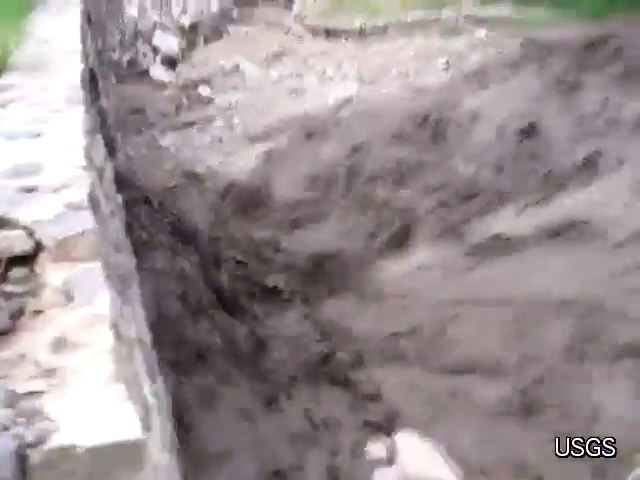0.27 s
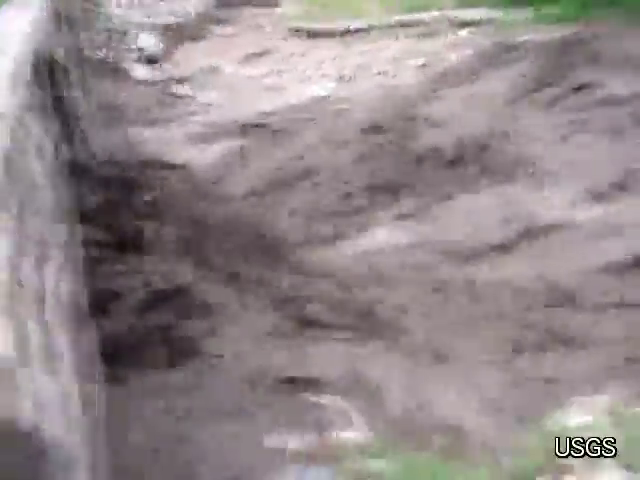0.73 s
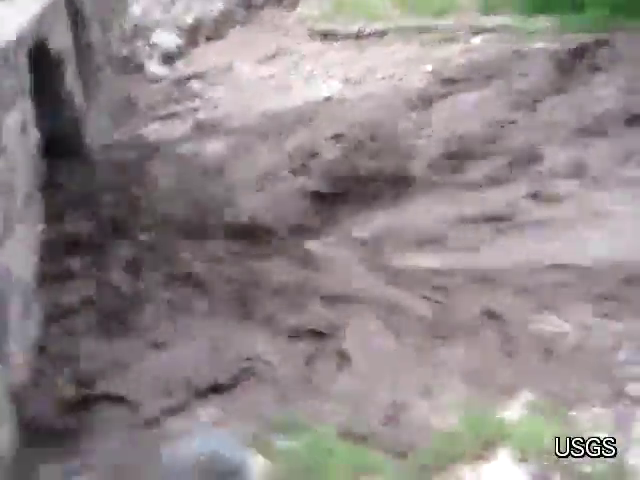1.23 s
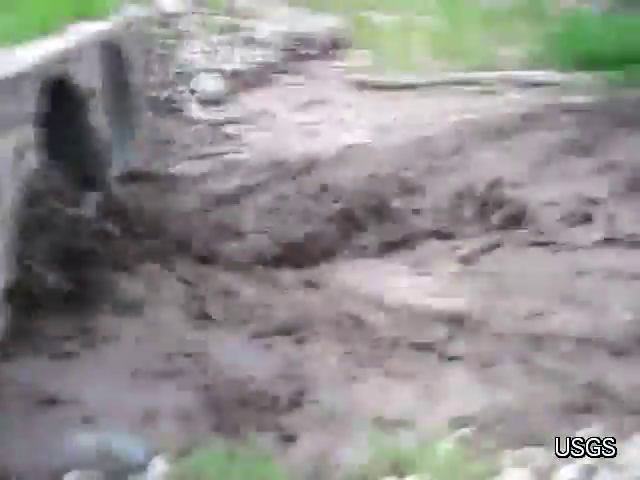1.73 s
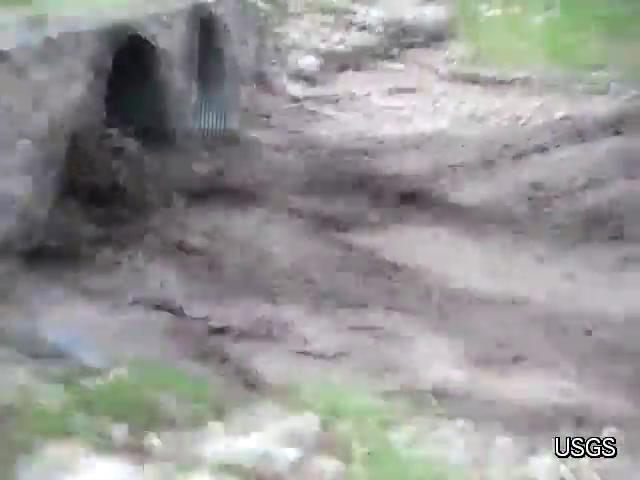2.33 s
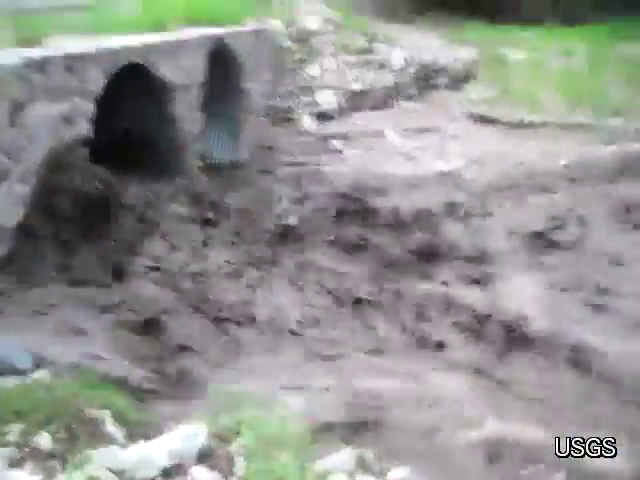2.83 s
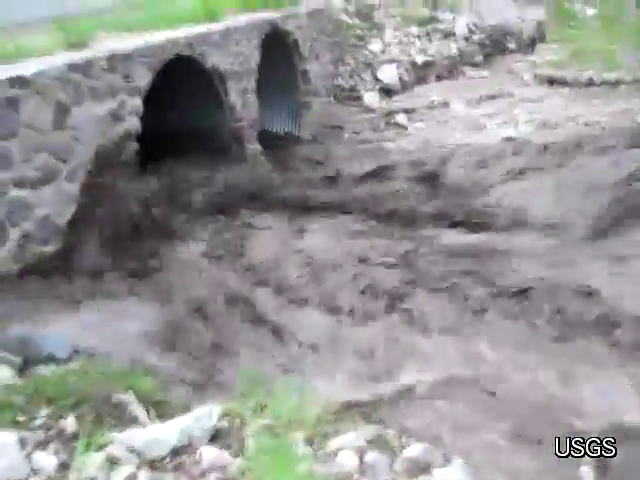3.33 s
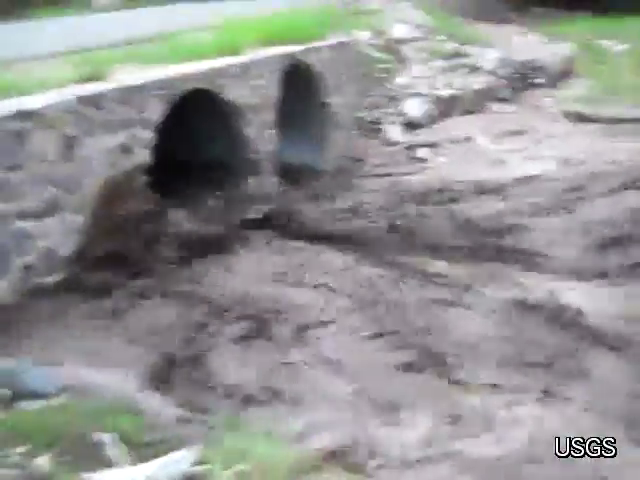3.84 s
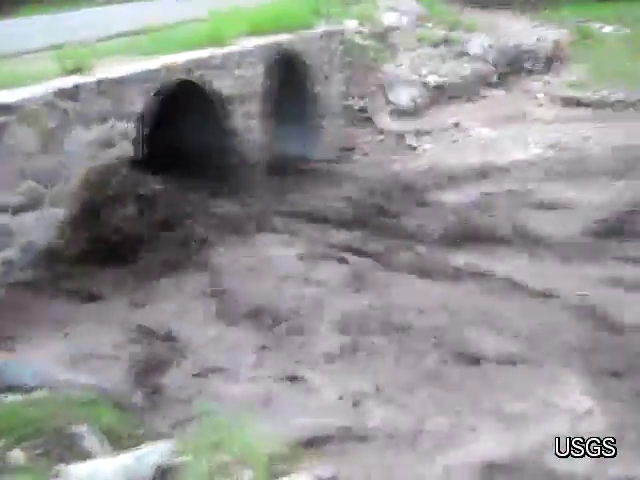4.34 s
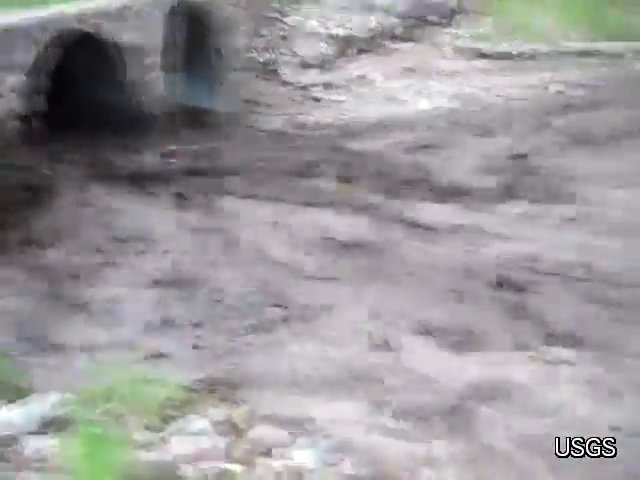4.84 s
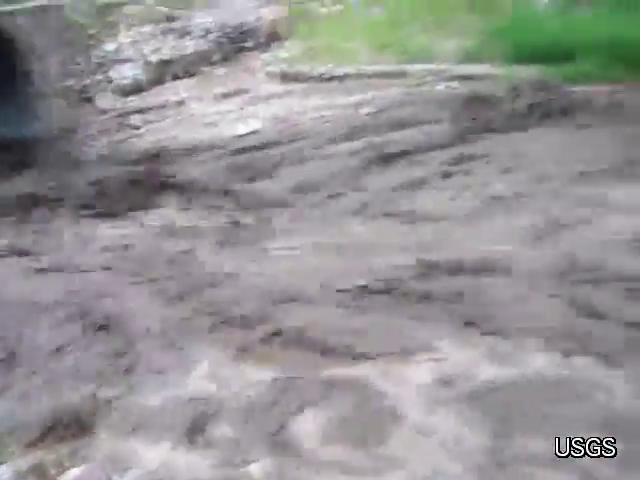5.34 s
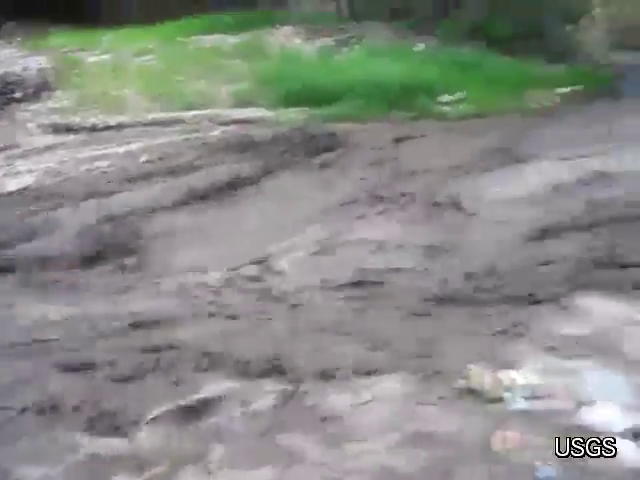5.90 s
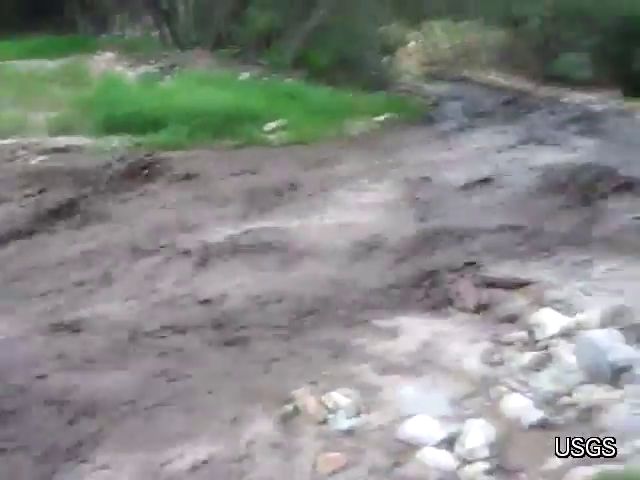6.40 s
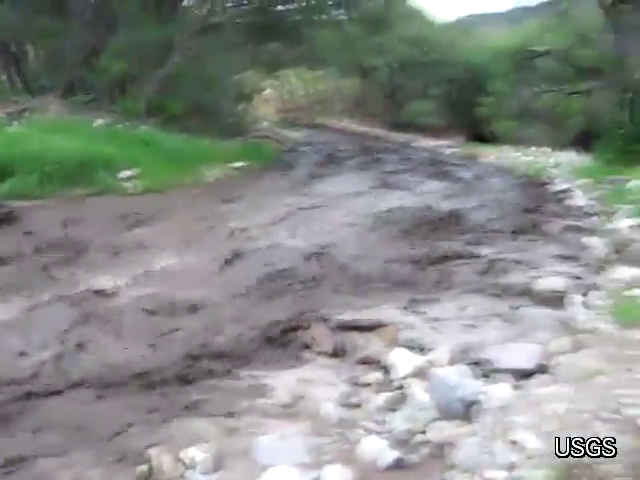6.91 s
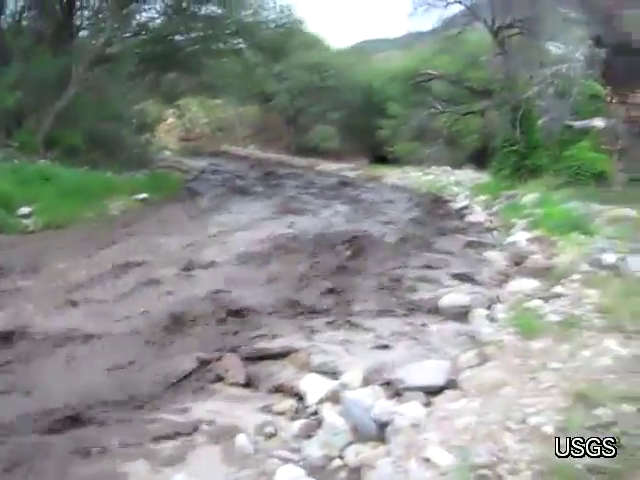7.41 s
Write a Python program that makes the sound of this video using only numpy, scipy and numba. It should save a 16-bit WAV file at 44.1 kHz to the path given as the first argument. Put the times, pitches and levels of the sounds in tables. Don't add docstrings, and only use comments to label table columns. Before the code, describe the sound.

From 0 s a loud, wet, broadband roar is in full flow: muddy floodwater pouring from a culvert over stones, heard from a few metres away outdoors. Deep rumble and dull boulder thumps lie below, bubbling churn in the middle, gritty hissing spray above. Hollow gulps stand out near 0.3, 2.1 and 2.6 s; sudden level dips follow crests around 0.6 and 0.9 s. A shifting, slightly hollow colour comes from the bank echo. From 1.3 to 3 s the water heaves heavily, with clustered thumps near 1.3 and 1.9 s. From 4.6 s surges strengthen, peaking near 5.6, 6.5 and 7.4 s, with more gurgling and churning and slightly less spray as the microphone turns to the open channel. Faint low wind puffs persist. The small camera sounds compressed, clipped and coarse, with dulled top treble. The roar continues to an abrupt end at about 7.7 s.

```python
import sys
import numpy as np
from scipy import signal
from scipy.fft import rfft, irfft, next_fast_len
from scipy.io import wavfile
from scipy.ndimage import uniform_filter1d, map_coordinates
from numba import njit

SR = 44100
rng = np.random.default_rng(int(sys.argv[2]) if len(sys.argv) > 2 else 0)


def master(y):
    cut = np.clip(np.atleast_2d(y).T, -1, 1)
    pcm = np.round(cut * 32767)
    wavfile.write(sys.argv[1], SR, pcm.astype(np.int16))


def linear_from_db(decibels):
    return 10 ** (np.asarray(decibels, float) / 20)


N = 337806

# t/s, surge of heavy water/dB, turn from wall to open channel/0-1
SURGE = [(0, 0, 0.54), (.25, -1, 0.5), (.9, -0.5, 0), (1.35, 1, 0.26), (1.8, 1.5, 0), (2.7, 1.5, 0.08),
         (3.05, -1.5, 0.05), (3.6, 0.5, 0.45), (4.2, -.5, 0.5), (4.6, 3, 0.12), (5.0, -0.5, 0.55),
         (5.55, 3, 0.62), (6.0, -0.5, 0.74), (6.55, 3, 0.86), (6.9, 3, 0.88), (7.35, 4.5, 0.86),
         (7.66, 0, 1)]
# t/s, crest before/dB, drop after/dB
CRESTS = [(.0, 0, 2.5), (.374, 0.5, 0.5), (.594, -1.5, 5.5), (.654, 2.5, 4.5), (.918, 2, 5.5),
          (1.541, 3, 1.5), (1.616, 0.5, 1), (1.741, 1.5, 3.5), (1.821, 3, 2), (2.105, -1, 0.5),
          (2.449, -1, 2), (2.604, 5, -1), (2.883, 0, 3), (3.058, 1.5, 1), (3.652, 1, 1), (3.826, 1.5, 0),
          (3.901, -2.5, 1.5), (4.121, -1, 3.5), (4.385, 1.5, 0.5), (4.624, 2, -0.5), (5.044, -0.5, 1.5),
          (5.268, 2, 2), (5.617, 6.5, 2), (5.852, 4, 1.5), (6.111, 1.5, 0), (6.346, 4, 0), (6.605, 2, -2.5),
          (7.2, 2.5, 0.5), (7.29, -2, 5), (7.513, 2.5, 4)]
# t/s, level/dB
HEAVES = [(0.14, -2.5), (0.269, -0.5), (0.713, 1.5), (1.023, 4), (1.167, 0), (1.422, -2), (1.729, 3),
          (2.02, 0.5), (2.09, 2), (2.227, -0.5), (2.342, -0.5), (2.602, 2), (3.283, 4.5), (3.382, -0.5),
          (3.582, -2), (3.677, 1.5), (3.884, 3), (4.26, 0), (4.365, -3), (4.6, -6), (4.742, -0.5),
          (4.822, -2.5), (4.906, -3), (5.006, 1), (5.181, -1.5), (5.273, 1.5), (5.393, 0.5), (5.475, 1),
          (5.607, -4.5), (5.732, 2), (5.814, 2), (5.994, 0), (6.129, 2), (6.328, -1.5), (6.408, -0.5),
          (6.707, 0), (6.787, -0.5), (6.864, -2.5), (7.121, -3), (7.458, -3)]
# t/s, level/dB
SPLASHES = [(0.04, -2), (0.1, -2.5), (0.165, 0.5), (0.322, 0), (0.479, -1), (0.776, -0.5), (0.876, -1.5),
            (0.96, 1.5), (1.018, 0), (1.117, 1.5), (1.277, 1.5), (1.427, 1.5), (1.589, 0.5), (1.656, -1.5),
            (1.739, -1.5), (1.786, -2), (1.868, 0.7), (2.217, 2.5), (2.285, -1), (2.517, 1.5),
            (2.604, -1.5), (2.789, -1), (2.844, -1.5), (2.881, 2), (2.961, -2), (3.013, -0.5), (3.095, -2),
            (3.185, 1.3), (3.283, -2.0), (3.487, -1.6), (3.547, -0.5), (3.652, 1), (3.734, -3), (3.786, 1),
            (3.919, -2.5), (3.968, 0), (4.086, 1.1), (4.283, 1.5), (4.734, 0), (4.944, -1), (5.173, 2),
            (5.5, -0.5), (5.56, -2), (5.6, -2.5), (5.692, 1), (5.969, -1.9), (6.036, 1), (6.181, -2),
            (6.281, 3), (6.343, -1.5), (6.43, 0), (6.503, 2), (6.61, -5.5), (6.717, 1.5), (6.79, -0.8),
            (6.874, 3), (7.159, -0.5), (7.545, 0)]
# f/Hz, level per Hz/dB
RUMBLE_SPECTRUM = [(60, -26.5), (90, -10), (130, -1.5), (190, -1), (260, -1), (330, -5.5), (450, -25)]
# f/Hz, level per Hz/dB
CHURN_SPECTRUM = [(250, -14.5), (350, -1.5), (480, 0), (700, 2), (850, -2), (1050, -4.5), (1500, -12.5)]
# f/Hz, level per Hz/dB
SPRAY_SPECTRUM = [(700, -24), (1100, -9.5), (1700, -5), (3200, -1.7), (4400, 0.5), (5000, -0.84),
                  (6000, -6.5), (7500, -29)]
# t/s, peak level/dB, f/Hz
THUMPS = [(.195, -8.5, 196), (1.04, -18, 273), (1.715, -20, 223), (0.464, -30, 204), (0.646, -11.5, 225),
          (0.947, -23, 188), (1.291, -9, 196), (1.358, -8.5, 183), (1.61, -9, 233), (1.903, -10, 240),
          (1.973, -12, 186), (2.017, -10, 190), (2.371, -13, 177), (2.928, -9.5, 185), (3.12, -25, 215),
          (3.639, -12.5, 143), (4.22, -12, 144), (4.688, -14, 200), (5.076, -16, 292), (5.204, -11, 214),
          (5.346, -22, 193), (5.748, -7, 193), (5.842, -9.5, 168), (5.994, -12, 211), (6.047, -15, 230),
          (6.365, -15, 155), (6.589, -12, 180), (7.228, -17, 204), (7.39, -7, 251), (7.48, -7, 186)]
# t/s, peak level/dB, f/Hz
BOOMS = [(0.182, -23, 96.9), (0.266, -20, 94.2), (0.568, -25, 102), (0.648, -19, 129), (0.801, -24, 110),
         (0.942, -28, 121), (1.07, -22, 117), (1.179, -24, 127), (1.589, -23, 116), (1.703, -25, 127),
         (2.22, -21, 105), (2.38, -28, 129), (2.578, -20, 108), (2.649, -23, 118), (2.77, -24, 80.7),
         (2.978, -24, 86.1), (3.127, -25, 129), (3.212, -24, 118), (3.417, -29, 102), (3.506, -25, 113),
         (3.777, -24, 88.8), (4.164, -27, 99.6), (4.323, -23, 113), (4.49, -24, 130), (4.656, -25, 129),
         (4.854, -22, 105), (4.991, -22, 128), (5.13, -26, 80.7), (5.282, -27, 80.7), (5.643, -22, 116),
         (5.828, -24, 129), (5.924, -26, 105), (6.116, -25, 129), (6.229, -27, 116), (6.42, -26, 94.2),
         (6.648, -25, 127), (6.807, -23, 105), (7.189, -27, 110), (7.37, -22, 94.2), (7.49, -22, 96.9)]
# t/s, peak level/dB, f/Hz
GULPS = [(0.042, -5, 590), (0.135, -13, 600), (0.344, -3, 694), (2.102, -2, 644), (2.561, 1, 725),
         (2.721, -7, 560), (3.007, -1.5, 620), (3.514, -6, 630), (4.22, -4, 554), (4.291, -15, 725),
         (4.644, -5, 585), (4.907, -22, 507), (5.154, -18, 548), (5.24, -18, 510), (5.595, -6, 481),
         (5.99, -14, 456), (6.372, -15, 507), (6.48, 1, 552), (6.708, -3, 495), (6.855, -7, 467),
         (7.073, -13, 606), (7.166, -11, 573), (7.37, -8, 480)]
# t/s, peak level/dB, f/Hz
GURGLES = [(0.254, -15, 135), (1.237, -18, 134), (1.514, -13, 242), (2.088, -14, 167), (2.215, -16, 178),
           (2.432, -17, 183), (2.522, -16, 215), (2.579, -17, 106), (2.631, -16, 199), (2.686, -21, 199),
           (3.001, -13, 225), (3.312, -15, 249), (3.402, -14, 188.4), (3.584, -18, 231), (3.679, -19, 216),
           (3.993, -15.5, 206), (4.325, -16, 210), (4.422, -16, 177), (4.53, -17, 197), (4.879, -12.5, 156),
           (5.268, -15, 177), (5.345, -18, 199.5), (5.403, -23, 194), (5.46, -16, 256), (5.525, -15, 172),
           (5.58, -12, 212), (5.635, -18, 207), (5.702, -18, 201), (5.784, -18, 187), (5.996, -21, 175),
           (6.124, -12, 149), (6.246, -12.5, 246), (6.363, -15, 155), (6.43, -17, 156), (6.854, -23, 330),
           (6.949, -14, 262), (6.992, -16, 195), (7.061, -17, 140), (7.159, -21, 150), (7.288, -13.5, 171)]
# t/s, peak level/dB, f/Hz
BLIPS = [(0.117, -22, 524), (0.312, -16.5, 701), (0.367, -16, 335), (1.05, -17, 332), (1.464, -16.5, 329),
         (1.666, -21, 333), (2.093, -21, 637), (2.549, -23, 715), (3.784, -17.5, 538), (3.953, -21, 423),
         (4.275, -20, 335), (4.724, -19, 593), (5.405, -14.5, 351), (5.602, -16, 517), (5.774, -25, 335),
         (5.979, -27, 452), (6.074, -20, 330), (6.136, -18, 330), (6.206, -20, 549), (6.266, -19, 497),
         (6.311, -20, 340), (6.413, -18, 665), (6.47, -23, 568), (6.528, -20, 600), (6.65, -15, 340),
         (6.692, -16, 526), (6.737, -14, 332), (6.854, -23, 330), (6.932, -15, 419), (6.994, -19, 615),
         (7.049, -18, 335), (7.086, -23, 330), (7.146, -17, 346), (7.186, -14.5, 495), (7.229, -23, 355),
         (7.271, -20, 423), (7.398, -20, 335), (7.48, -23, 360), (7.54, -19, 570), (7.578, -22, 522)]
# t/s, peak level/dB, f/Hz
POPS = [(0.117, -20, 780), (0.325, -18, 713), (0.67, -20, 743), (0.741, -18, 877), (0.806, -14, 920),
        (1.179, -17, 743), (1.336, -16, 721), (1.408, -18, 748), (1.517, -18, 705), (2.013, -20, 813),
        (2.196, -16, 902), (2.323, -19, 802), (2.385, -17, 888), (2.562, -15, 716), (2.653, -19, 764),
        (2.81, -16, 724), (2.874, -16, 820), (3.313, -21, 1160), (3.669, -19, 1020), (3.774, -15, 1020),
        (4.046, -19, 1060), (4.365, -18, 773), (4.604, -19, 724), (4.711, -19, 791), (4.951, -20, 724),
        (5.037, -17, 1050), (5.344, -19, 1040), (5.645, -22, 860), (5.805, -18, 716), (6.031, -15, 942),
        (6.177, -21, 713), (6.258, -15, 704), (6.334, -17, 904), (6.423, -17, 703), (6.811, -18, 1010),
        (6.876, -13, 795), (7.091, -19, 1050), (7.274, -19, 1040), (7.412, -18, 1150), (7.608, -19, 732)]
# t/s, peak level/dB, f/Hz
TONES = [(.795, -18.5, 905), (.88, -23, 965), (.92, -23, 972), (.955, -18, 978), (.63, -18, 590),
         (1.09, -21, 680), (3.55, -14.5, 507), (5.14, -14.5, 555)]
# t/s, centre f/Hz, depth/0-1
DIP = [(0, 880, 0.5), (.4, 940, 0.24), (.75, 1120, 0.05), (.95, 560, 0.23), (1.3, 510, 0.53),
       (1.8, 530, 0.62), (2.1, 440, 0.66), (2.4, 470, 0.34), (2.65, 470, 0.65), (2.9, 490, 0.4),
       (3.1, 503, 0), (3.5, 850, 0.24), (4.5, 845, 0.24), (5.201, 790, 0.3), (6.0, 760, 0.3),
       (6.8, 710, 0.35), (7.66, 696, 0.48)]
# f/Hz, level per Hz/dB
BUFFET_SPECTRUM = [(15, -34), (25, -27.5), (45, -14), (75, -4.5), (95, -4.5), (140, -24.5)]
# t/s, level over the breeze/dB
GUSTS = [(.28, 12), (.65, 7), (1.36, 6), (1.62, 1), (2.05, 5), (2.55, 6.5), (2.79, 9), (3.5, 6), (3.99, 4),
         (4.8, 9), (5.42, 5), (5.72, 7), (6.02, 5), (6.47, 1), (6.93, 8), (7.4, 6), (7.58, 10)]


def rumble(t, surge_db, crest_db):
    crest_share = 0.45
    cloud = bubbles(count=3000, lo_hz=70, hi_hz=420, cycles=8, spread_db=1.6)
    level_db = -24.5 + surge_db + crest_share * crest_db + swells(t, HEAVES, width_s=0.05)
    return linear_from_db(level_db) * water(RUMBLE_SPECTRUM, cloud, share=0.15, flicker_db=0.2, rate_hz=9)


def churn(surge_db, turn, crest_db, splash_db):
    surge_share, turn_db, crest_share = 0.1, 3, 0.8
    cloud = bubbles(count=10000, lo_hz=280, hi_hz=1400, cycles=14, spread_db=1.8)
    level_db = -24.5 + surge_share * surge_db + turn_db * turn + crest_share * crest_db + splash_db
    return linear_from_db(level_db) * water(CHURN_SPECTRUM, cloud, share=0.2, flicker_db=0.3, rate_hz=12)


def spray(surge_db, turn, crest_db, splash_db):
    surge_share, turn_db = -0.18, -1.3
    cloud = bubbles(count=60000, lo_hz=800, hi_hz=7000, cycles=8, spread_db=2.2)
    level_db = -20 + surge_share * surge_db + turn_db * turn ** 2 + crest_db + splash_db
    return linear_from_db(level_db) * water(SPRAY_SPECTRUM, cloud, share=0.2, flicker_db=0.3, rate_hz=24)


def boulders():
    thumps = struck(THUMPS, t60_s=0.09, rise=0.033, glide=0.095, trim_db=1.0)
    booms = struck(BOOMS, t60_s=0.2, rise=0.088, glide=0.05, trim_db=3.5)
    return thumps + booms


def air_pockets():
    gulps = struck(GULPS, t60_s=0.041, rise=0.11, glide=0.079, trim_db=-4.5)
    gurgles = struck(GURGLES, t60_s=0.12, rise=0.09, glide=0.049, trim_db=4.5)
    blips = struck(BLIPS, t60_s=0.12, rise=0.092, glide=0.08, trim_db=5.0)
    pops = struck(POPS, t60_s=0.07, rise=0.1, glide=0.06, trim_db=-2.5)
    return gulps + gurgles + blips + pops


def lingering_pockets():
    return struck(TONES, t60_s=0.17, rise=0.2, glide=0.065, trim_db=6.5)


def bank_echo(flood, t):
    s, hz, depth = np.transpose(DIP)
    return cancel(flood, np.interp(t, s, hz), np.interp(t, s, depth), 0.3, 1. * SR)


def wind(t, turn):
    level_db = -39.5 + 3 * turn + swells(t, GUSTS, width_s=0.07)
    return linear_from_db(level_db) * colour(rng.standard_normal(N), BUFFET_SPECTRUM)


def crests(t):
    build_s, recover_s, drop_s = 0.044, 0.036, 0.014
    db = np.zeros(N)
    for s, up, down in CRESTS:
        before = up * np.exp(np.minimum(t - s, 0) / build_s)
        after = -down * np.exp(np.minimum(s - t, 0) / recover_s)
        db += np.where(t < s, before, after)
    return uniform_filter1d(db, int(drop_s * SR) + 1)


def swells(t, table, width_s):
    return sum(db * np.exp(-((t - s) / width_s) ** 2) for s, db in table)


def water(spectrum, cloud, share, flicker_db, rate_hz):
    near = np.sqrt(share) * colour(cloud, spectrum)
    far = np.sqrt(1 - share) * colour(rng.standard_normal(N), spectrum)
    return (near + far) * linear_from_db(flicker_db * walk(rate_hz))


def bubbles(count, lo_hz, hi_hz, cycles, spread_db):
    when, pitch, big = rng.random((count, 3)).T
    hz = lo_hz * (hi_hz / lo_hz) ** pitch
    size = linear_from_db(-spread_db * np.log(1 - 0.998 * big))
    return ring((when * N).astype(np.int64), hz, cycles / hz, 0.12, 0.25, size, N, 1. * SR)


def struck(table, t60_s, rise, glide, trim_db):
    s, db, hz = np.transpose(table)
    start = (s * SR).astype(np.int64)
    return ring(start, hz, np.full(len(s), t60_s), rise, glide, linear_from_db(db + trim_db), N, 1. * SR)


@njit
def ring(start, hz, t60, rise, glide, size, n, sr):
    y = np.zeros(n)
    for k in range(len(start)):
        length = t60[k] * sr
        fade = np.exp(-np.log(1000.) / length)
        swell = np.exp(-1 / (rise * length))
        level, unswollen = size[k], 1.
        step, phase = 2 * np.pi * hz[k] / sr, 0.
        for i in range(start[k], min(n, start[k] + int(length))):
            y[i] += level * (1 - unswollen) * np.sin(phase)
            level *= fade
            unswollen *= swell
            phase += step
            step *= 1 + glide / length
    return y


@njit
def cancel(x, hz, depth, width, sr):
    y, band, low = np.empty(len(x)), 0., 0.
    for i in range(len(x)):
        g = np.tan(np.pi * hz[i] / sr)
        v = (band + g * (x[i] - low)) / (1 + g * (g + width))
        band = 2 * v - band
        low += 2 * g * v
        y[i] = x[i] - depth[i] * width * v
    return y


def colour(x, spectrum):
    hz, db = np.transpose(spectrum)
    size = next_fast_len(N)
    f = np.maximum(np.arange(size // 2 + 1) * SR / size, 1)
    gain = linear_from_db(np.interp(np.log(f), np.log(hz), db, -90, -90))
    y = irfft(rfft(x, size) * gain, size)[:N]
    return y / y.std()


def walk(rate_hz):
    hold = int(SR / rate_hz)
    y = np.repeat(rng.standard_normal(2000), hold)[:N]
    y = uniform_filter1d(uniform_filter1d(y, hold), hold)
    return y / y.std()


def scene():
    t = np.arange(N) / SR
    s, surge, turned = np.transpose(SURGE)
    surge_db, turn = np.interp(t, s, surge), np.interp(t, s, turned)
    crest_db = crests(t)
    splash_db = swells(t, SPLASHES, width_s=0.02)
    flood = rumble(t, surge_db, crest_db)
    flood = flood + churn(surge_db, turn, crest_db, splash_db)
    flood = flood + spray(surge_db, turn, crest_db, splash_db)
    flood = flood + boulders() + air_pockets()
    flood = bank_echo(flood, t)
    flood = flood * linear_from_db(0.3 * walk(16))
    return (flood + wind(t, turn) + lingering_pockets())[None]


@njit
def follow(x, attack, release, floor):
    e, y = floor, np.empty(len(x))
    for i in range(len(x)):
        a = max(abs(x[i]), floor)
        e += (a - e) * (attack if a > e else release)
        y[i] = e
    return y


def gain_control(x):
    threshold, ceiling = 0.38, 0.44
    attack_s, release_s = 0.0003, 0.045
    peak = follow(x, 1 / (attack_s * SR), 1 / (release_s * SR), threshold)
    return np.clip(x * (threshold / peak) ** 1.1, -ceiling, ceiling)


def slow_sampling(x):
    skip, smooth_hz, top_hz = 4, 3730, 10300
    sparse = np.zeros(N)
    sparse[::skip] = skip * x[::skip]
    size = next_fast_len(N)
    f = np.arange(size // 2 + 1) * SR / size
    bell = np.exp(-(f / smooth_hz) ** 2) / (1 + (f / top_hz) ** 20)
    return irfft(rfft(sparse, size) * bell, size)[:N]


def clock_slips(x, t):
    frame_s, first_s, slip_samples = 2048 / 48000, 0.0107, 0.45
    frame = np.floor((t - first_s) / frame_s)
    slips = np.floor(frame * 29 / 81 + 0.488)
    place = np.arange(N) - slip_samples * uniform_filter1d(slips, size=5)
    return map_coordinates(x, [place], order=5, mode="reflect")


def low_pass(x):
    return signal.sosfilt(signal.butter(12, 12680, fs=SR, output="sos"), x)


def record(dry):
    t = np.arange(N) / SR
    x = gain_control(dry[0])
    x = slow_sampling(x)
    x = clock_slips(x, t)
    edge_s = 0.0015
    x = x - 0.11 * np.exp(-(t / edge_s) ** 2)
    x = x - 0.17 * np.exp(-((t[-1] - t) / edge_s) ** 2)
    mix = x[None] - 0.0151
    return low_pass(mix)


dry = scene()
out = record(dry)
master(out)
```